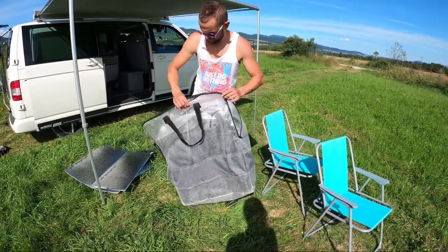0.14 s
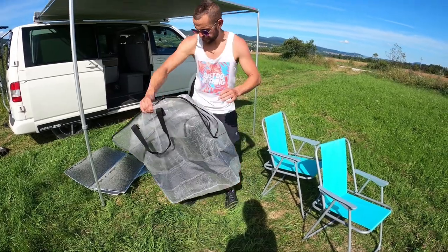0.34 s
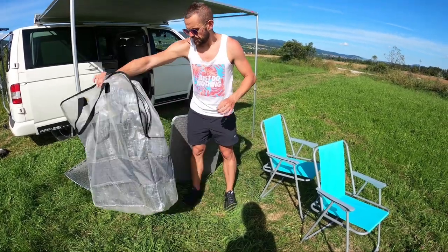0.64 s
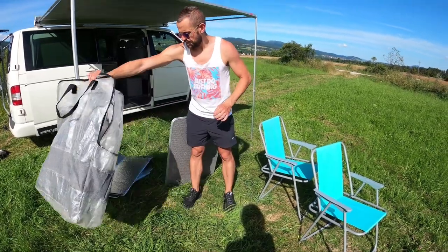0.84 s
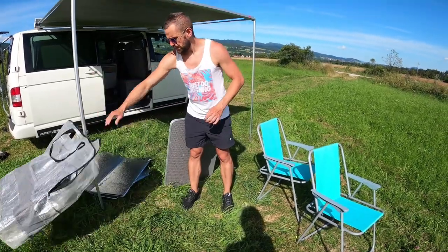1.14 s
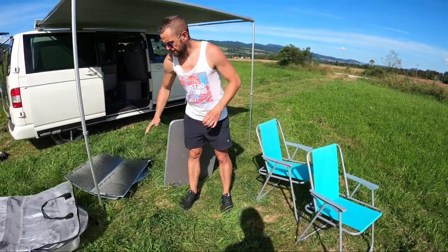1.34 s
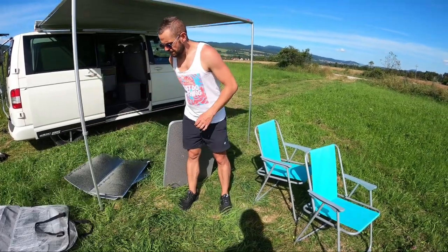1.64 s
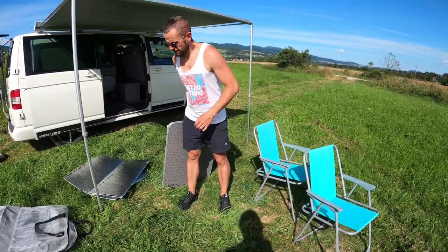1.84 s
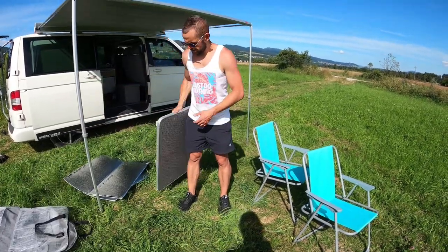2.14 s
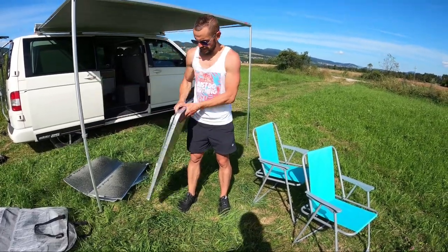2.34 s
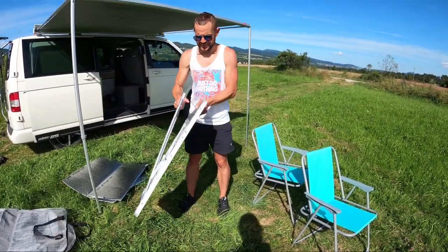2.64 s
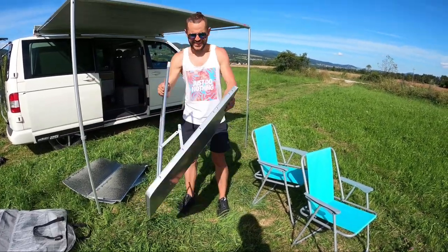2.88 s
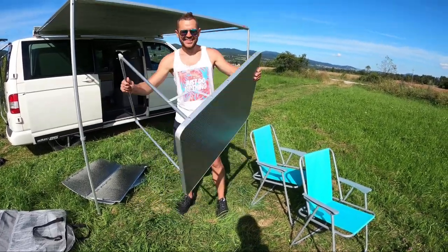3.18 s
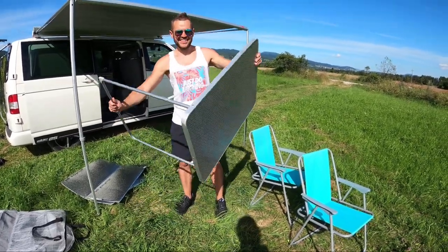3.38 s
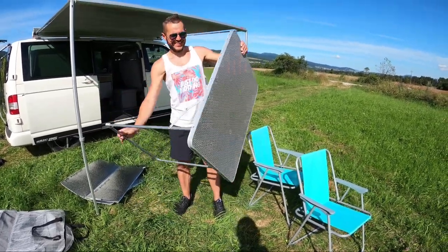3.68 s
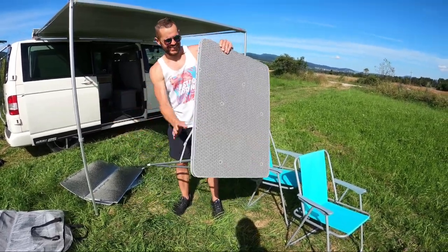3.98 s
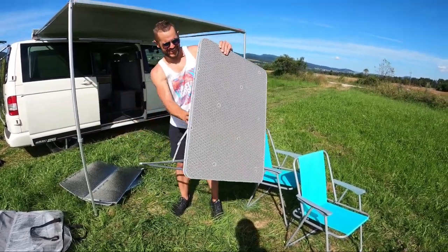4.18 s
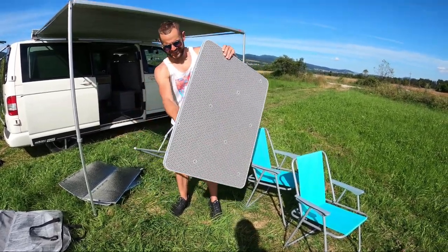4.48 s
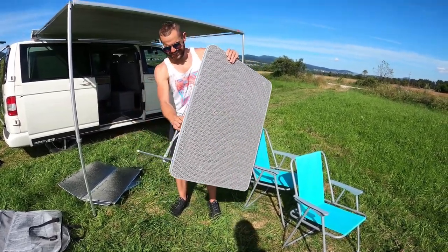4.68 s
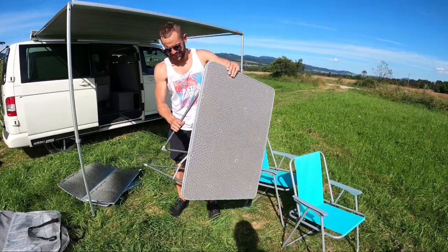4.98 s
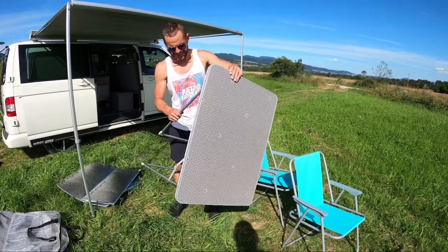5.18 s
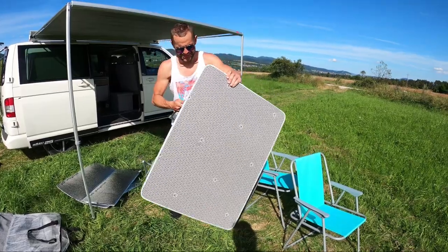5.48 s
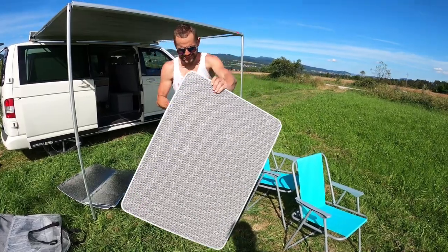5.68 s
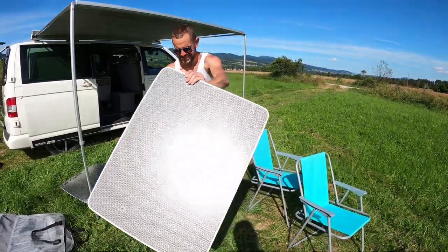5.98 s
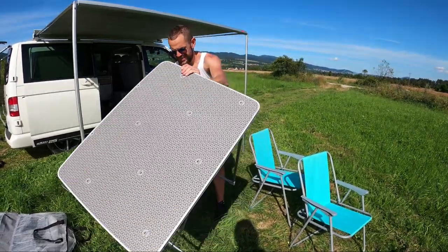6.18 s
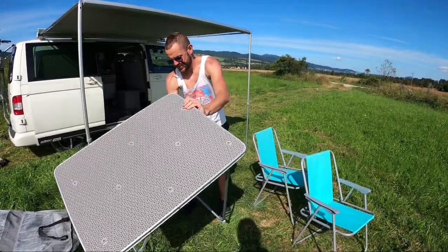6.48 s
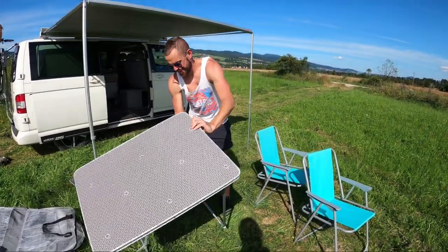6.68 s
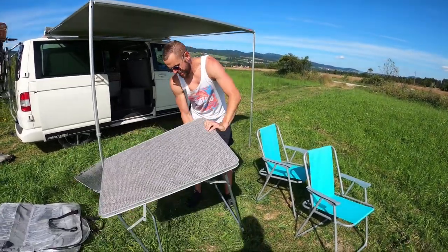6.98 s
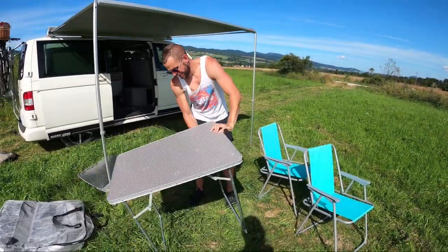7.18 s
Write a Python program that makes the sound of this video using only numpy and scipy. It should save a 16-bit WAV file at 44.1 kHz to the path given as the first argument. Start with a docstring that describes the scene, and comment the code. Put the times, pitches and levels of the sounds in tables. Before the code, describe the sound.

A stiff fabric bag crumples and crunches into grass, then folding table legs clack and groan open before the table is knocked down onto grass.

```python
"""A meadow in the open air, with no echo: soft open air, dry grass, and wind buffeting the microphone ports.
First a stiff fabric bag is pulled off a folding table: noise and tiny ringing cracks crumple, folds pop.
It is tossed to the left and crunches into the grass. Then hands rub the top, and the tubular legs swing out:
hinges and braces clack into the thin top as chattering bursts over ringing modes, stiff hinges drone and grind.
Last, the table is set down on its legs, which changes the balance of the top's modes."""
import sys
import numpy as np
from scipy import signal
from scipy.fft import rfft, irfft, next_fast_len
from scipy.io import wavfile
from scipy.ndimage import map_coordinates

SR = 44100
rng = np.random.default_rng(int(sys.argv[2]) if len(sys.argv) > 2 else 0)


def unload_audio(sound):
    """Save the sound as a 16-bit wav file, at the path given as the first command line argument."""
    columns = np.transpose(np.atleast_2d(sound))
    # keep every value between -1 and 1, then stretch to whole-number steps
    steps = np.round(np.clip(columns, -1, 1) * 32767)
    wavfile.write(sys.argv[1], SR, steps.astype(np.int16))


N = 323253

TOP_HZ = 15800  # band limit at the microphone
BAG_S = 2.3  # the bag lies still by then
SET_DOWN_S = 6.75  # from here on the table stands on its legs
MEADOW_DB, BREEZE_DB = -56.5, -64  # open country; light air between gusts (both before trims)
THUMP_SHARE = 0.21  # thump pitch over knock pitch
TUBE_HZ, TUBE_PER_HARDNESS = 2580, 0.87  # clink pitch of the tubes; clink dB per dB of hardness
CLICK_S, BODY_S = 0.006, 0.0056  # chatter time of these contacts
# how fast swells rise and fall, dB per s
GUST_RISE, GUST_FALL = 210, 122
BAG_RISE, BAG_FALL = 156, 200
SKID_RISE, SKID_FALL = 270, 1100
LAND_RISE, LAND_FALL = 260, 200
RUB_RISE, RUB_FALL = 110, 69
SLIDE_RISE, SLIDE_FALL = 200, 200
DRAG_RISE, DRAG_FALL = 375, 370

# Event levels below are before the trims (.._db) of the functions; spectra are relative.
# likeness of left and right, for more alike and for wider, less alike sounds: [f/Hz, likeness -1 to 1]
MORE_ALIKE = [(250, 0.99), (1000, 0.86), (2500, 0.66), (5000, 0.7), (12000, 0.049)]
LESS_ALIKE = [(150, 0.7), (1000, 0.057), (4000, 0.23), (12000, 0.11)]
BUFFET_ALIKE = [(25, -.1), (60, .5), (130, .8)]
# microphone colour: [f/Hz, left minus right level/dB]
PORT_COLOUR = [(250, -.6), (500, 0), (1100, -1.2), (2500, 1.3), (4500, .4), (9000, -3)]

# spectrum of the open country, and of dry grass stirring: [f/Hz, level/dB]
MEADOW_SPECTRUM = [(35, -40.5), (60, 14.5), (98, -42), (179, -0.5), (343, 0.5), (650, -13), (1250, -3),
                   (1700, -4.5), (2470, -10), (2910, -10), (8870, -22.5), (12300, -42), (13800, -70),
                   (15500, -90)]
STIR_SPECTRUM = [(500, -15), (1300, 0), (4500, -11), (12000, -33)]
# spectrum of the wind on the ports: [f/Hz, level/dB]
BUFFET_SPECTRUM = [(11, -35), (18, 9.5), (85, -5), (184, -22), (241, -27.5), (305, -46), (400, -56),
                   (520, -50), (880, -120)]
# gusts reach the microphone: [start t/s, hold t/s, level/dB]
GUSTS = [(0, 0.059, -54), (1.8, 0.096, -59), (3.79, 0.65, -47), (4.72, 0.16, -44.5), (5.74, 0.068, -35),
         (5.815, 0.05, -25.5), (5.99, 0.057, -25.5), (6.2, 0.12, -45.5), (6.5, .02, -41.5),
         (6.555, 0.077, -34.5), (6.8, 0.18, -40)]
# single low pushes, wind eddies and a low thud of the bag: [centre t/s, envelope peak level/dB, f/Hz]
LOW_PUSHES = [(.165, -45, 55.3), (4.026, -35.5, 47.5), (5.838, -17.5, 71.6), (5.846, -25, 138),
              (6.011, -25, 153), (6.04, -30, 61), (6.564, -23, 30.3), (6.569, -38, 89),
              (6.629, -30.5, 81.6), (6.814, -21, 66)]

# the bag is dragged off, pulled free, held out, tossed, and sinks together:
# [start t/s, hold t/s, crumple level/dB, sliding hiss level/dB, billow level/dB]
BAG_MOVES = [(0, 0.14, -42, -52, -52), (.2, 0.076, -44.5, -56, -52), (.335, 0.044, -41.5, -50, -52),
             (.47, 0.016, -46, -61.5, -52.5), (.56, 0.017, -48.5, -57.5, -52.5),
             (.65, 1.3, -59.5, -68, -68.5), (1.18, 0.082, -53, -58.5, -56.5), (1.6, 0.036, -42, -45, -45.5),
             (1.67, 0.039, -58, -66, -50)]
# the bag's bottom edge skids over the grass: [start t/s, hold t/s, level/dB]
SKID = [(1.2, 0.072, -45.5)]
# a corner, then the whole bag, crushes the grass: [start t/s, hold t/s, level/dB]
LANDING = [(1.505, .03, -46), (1.548, .02, -43), (1.59, 0.043, -36.5)]
# spectra of weave, sliding, skidding over grass and crushed grass: [f/Hz, level/dB]
CRUMPLE_SPECTRUM = [(41, -73), (70, -27), (300, 2.5), (400, -6.5), (520, -7), (690, -5), (1160, -3.5),
                    (1900, -7), (2400, -14.5), (3460, -12), (5530, -25), (9000, -35), (11700, -38),
                    (19800, -120)]
HISS_SPECTRUM = [(1470, -12), (2500, -6), (3100, -9), (5570, -16), (8680, -28), (15500, -36)]
GRASS_SPECTRUM = [(500, -26), (1300, 3), (2500, -1.5), (4700, 1.5), (6500, -5), (8800, -8.5), (11000, -17),
                  (15500, -28)]
CRUNCH_SPECTRUM = [(200, -21), (500, -11.5), (800, -3.5), (1100, 3.5), (1900, -7.5), (3400, -5.5),
                   (5200, -17.5), (9000, -24), (15500, -50)]
# short pops of bag folds, with a few small grass rustles:
# [t/s, crack peak level/dB, crack f/Hz, tick peak level/dB]
POPS = [(.009, -33, 920, -57), (0.073, -24, 2410, -30), (0.096, -34, 870, -68), (0.141, -32, 586, -68),
        (0.166, -31, 796, -67), (0.183, -33, 2550, -56), (.232, -29, 1420, -55), (0.262, -26, 1500, -64),
        (0.293, -29, 1500, -61), (.328, -39, 895, -54), (.357, -32, 900, -53), (.365, -26.5, 1080, -48),
        (0.384, -27.5, 1320, -73), (.426, -33.5, 2300, -61), (0.463, -32.5, 1070, -69),
        (0.487, -39, 1400, -66), (0.546, -39, 1700, -66), (0.575, -34, 1280, -39), (.63, -26.5, 2270, -50),
        (0.682, -36, 4200, -35), (0.797, -38, 3130, -53.5), (1.031, -46, 1400, -68),
        (1.075, -51, 1230, -57), (1.131, -37.5, 1240, -63), (1.188, -31.5, 3580, -50),
        (1.206, -44, 3000, -54), (1.365, -38, 1350, -64), (1.404, -40, 3020, -68),
        (1.659, -33.5, 2400, -50), (1.72, -34.5, 2770, -53), (1.749, -38.5, 1060, -61),
        (1.829, -44, 1280, -63)]
# spectrum of one pop: [f/Hz, level/dB]
POP_SPECTRUM = [(1500, 0.5), (4000, -1.5), (9000, -4), (14000, -28.0)]

# modes of the top on its frame: [nominal f/Hz, held level/dB, standing level/dB, t60 t/s]
TOP_MODES = [(95, 0, -4, .2), (117, -7, 1, .26), (179, -8, 0, .25), (222, -8, -4, .14), (284, 3, -11, .15),
             (345, -2, -4, .1), (393, -6, -3, .11), (441, -3, 3, .13), (570, 2, -14, .14),
             (679, -10, 1, .13), (732, 2, -2, .12), (810, 3, 2, .13), (895, 3, 3, .13), (1075, -2, -6, .12),
             (1178, -5, -3, .13), (1255, -9, -2, .11), (1325, -4, -2, .11), (1520, -1, -6, .12),
             (1590, -1, -4, .12), (1750, -5, -6, .11), (1888, -5, -2, .13), (2158, -2, -2, .13),
             (2690, -7, -8, .1), (3069, -9, -8, .1), (3330, -6, -11, .1), (3461, -12, -9, .1),
             (4062, -16, -13, .1)]
# decay of the dense modes of the frame: [f/Hz, t60 t/s]
FRAME_DECAY = [(150, 0.46), (800, 0.17), (3000, 0.12), (10000, 0.16)]
# spectrum of one contact: [f/Hz, level/dB]
CLACK_SPECTRUM = [(60, -5.5), (150, 5), (300, 3.5), (440, 5.5), (540, 2.5), (830, 3), (1700, 0),
                  (2150, 0.5), (2450, -4), (3300, -8), (5000, -7.5), (7000, -27.5), (9500, -34),
                  (12000, -44), (15500, -55)]
# low and middle body of blows on the top, with some soft thuds: [t/s, level/dB, pitch f/Hz]
BODIES = [(1.88, -42.5, 153), (1.92, -43.5, 189), (1.95, -45.5, 221), (1.975, -42.5, 202),
          (2.187, -59, 200), (2.268, -58.5, 425), (2.345, -59.5, 483), (2.542, -54.5, 219),
          (3.112, -44, 496), (3.147, -39.5, 342), (4.167, -27, 300), (4.173, -30, 90), (4.216, -27.5, 85),
          (4.228, -27, 515), (4.275, -35, 630), (4.305, -35, 110), (4.346, -43, 130), (4.815, -32.5, 167.6),
          (4.82, -33, 650), (4.86, -25.5, 403), (4.867, -26, 800), (4.902, -32, 795), (5.116, -51, 185),
          (6.668, -44, 187.2), (6.797, -34.5, 86), (6.817, -24.5, 78), (6.847, -25, 600), (6.848, -26, 240),
          (6.85, -26, 98.4), (6.876, -35, 560), (6.93, -32, 610), (6.971, -29.5, 188), (6.987, -28.5, 620),
          (7.02, -35.5, 181)]
# hands, clothes and tubes rubbing, and a step on grass; long rows are the steady grip:
# [start t/s, hold t/s, scrape level/dB, hiss level/dB]
RUBS = [(1.9, 3.8, -61.5, -70.5), (2.25, 0.035, -65, -56), (2.55, 0.11, -77, -63.5), (2.8, 0.4, -60, -60.5),
        (3.46, 0.076, -51, -59.5), (4.48, 0.5, -51, -95), (5.17, 0.12, -53, -63), (5.59, 0.032, -63, -84),
        (5.6, 3.3, -64, -93), (6.66, 0.043, -52, -73), (7.08, 0.31, -91, -65.5)]
# the top brushes past clothing: [start t/s, hold t/s, level/dB]
SLIDE = [(2.9, 0.066, -48.5)]
# spectra of scraping, brushing and passing clothing: [f/Hz, level/dB]
SCRAPE_SPECTRUM = [(88, -12.5), (150, 14), (251, 6), (292, 3.5), (457, -0.5), (1300, 2), (2340, -10),
                   (8000, -34.5), (10400, -89), (17600, -120)]
BRUSH_SPECTRUM = [(2000, 0), (5000, -5.0), (9000, -9.0), (12500, -16), (15500, -34)]
SWISH_SPECTRUM = [(880, -6), (1500, -3.5), (2370, -3.5), (4390, -3), (6750, -14.5), (9420, -13),
                  (14200, -30), (15500, -36)]
# legs and braces knock on the top: [t/s, level/dB, pitch f/Hz, contact hardness/dB, chatter t/s]
KNOCKS = [(1.92, -38, 1170, 0.5, 0.03), (1.974, -47, 1680, -5, 0.003), (2.572, -48, 1680, -3, 0.0096),
          (2.715, -44, 1160, 9, 0.017), (2.992, -36.5, 1280, -8, 0.0041), (3.11, -28, 2050, 18.5, 0.008),
          (3.132, -30, 1720, -16, 0.024), (3.147, -32, 1000, 10, 0.0025), (3.42, -34.5, 1800, 1, 0.0065),
          (3.54, -39, 840, 15, 0.0046), (3.655, -33, 815, 2, 0.0023), (3.725, -25.5, 2000, 7, 0.0014),
          (3.74, -33, 760, 9.5, 0.03), (4.166, -29, 890, 10, 0.011), (4.184, -25.5, 655, 7.5, 0.034),
          (4.223, -16, 1220, -1, 0.0024), (4.227, -12, 960, 6, 0.0016), (4.269, -24.5, 890, 4.5, 0.0075),
          (4.274, -18.5, 880, 1, 0.01), (4.302, -29, 690, 9.5, 0.0051), (4.33, -29, 765, -1, 0.0086),
          (4.364, -29, 890, 2, 0.0044), (4.375, -23.5, 970, -3, 0.0012), (4.502, -31.5, 890, -4, 0.003),
          (4.544, -34.5, 950, -5, 0.0068), (4.74, -43, 1200, 1, .008), (4.76, -18.5, 1084, 4.5, 0.0085),
          (4.817, -21, 633, -12, 0.0085), (4.856, -16, 840, -4, 0.0053), (4.864, -16.5, 770, -8, 0.0041),
          (4.877, -16.5, 766, -4.5, 0.0095), (4.9, -19.5, 740, -6, 0.0079), (4.927, -21, 838, -11, 0.0048),
          (4.988, -32, 635, 2.5, 0.014), (5.116, -36.5, 770, 14, 0.004), (5.222, -41.5, 1580, 21.5, 0.0071),
          (5.263, -36, 713, -6, 0.019), (5.304, -35.5, 835, -5, 0.007), (5.355, -31.5, 866, -7, 0.0026),
          (6.667, -47.5, 1000, 10, 0.006), (6.703, -46, 1105, 4, 0.0076), (6.804, -30.5, 800, 9, 0.017),
          (6.824, -20.5, 994, 10.5, 0.006), (6.848, -8.5, 830, 7, 0.0035), (6.871, -35, 1000, 23.5, 0.037),
          (6.913, -27.5, 790, 9, 0.019), (6.925, -25, 1120, 8, 0.0077), (6.931, -12.5, 975, 8.5, 0.012),
          (6.973, -29, 1670, 18, 0.005), (6.989, -16.5, 893, 6.5, 0.0064), (7.05, -27.5, 725, 11.5, 0.0048),
          (7.104, -40, 1100, -15, 0.0086)]
# light clicks of metal, the bright edge of some hard knocks, and a small grass rustle:
# [t/s, level/dB, pitch f/Hz, contact hardness/dB]
CLICKS = [(2.013, -60, 3800, -18), (2.165, -50, 4334, -2), (2.182, -55, 3100, -7),
          (3.059, -42.5, 2350, -13), (3.082, -48.5, 2640, -11), (3.947, -47.5, 3920, -4),
          (4.377, -37.5, 2460, -30), (6.391, -43.5, 3100, -1.5), (6.502, -49.5, 2690, -4.5),
          (6.639, -61, 2500, 1.5), (6.794, -45, 3125, -1.5), (6.849, -39.5, 3000, 8.5)]
# hinges drag under load: [start t/s, hold t/s, drone level/dB, grind level/dB, drone f/Hz]
DRAGS = [(4.197, 0.15, -35.5, -38.5, 285), (4.41, 0.0495, -33, -60, 110.8), (4.507, 0.17, -38, -68, 299.2),
         (4.747, 0.025, -38, -40, 307.5), (4.808, 0.02, -29, -29.5, 281), (4.864, 0.052, -19, -22, 275.5),
         (4.954, 0.026, -31, -40, 282), (5.127, 0.044, -37, -64, 157), (5.254, 0.066, -45.5, -51, 292.6),
         (6.851, 0.13, -24.5, -28, 116.2)]


def amp(db):
    """Decibels to gain."""
    return 10 ** (np.asarray(db) / 20)


def unit(x):
    """Scale to rms 1."""
    return x / np.sqrt(np.mean(x ** 2) + 1e-20)


def along(points, hz):
    """Read (Hz, value) points on a log axis."""
    f, v = np.transpose(points)
    return np.interp(np.log(hz + 1), np.log(f + 1), v)


def wobble(rate):
    """A smooth random curve, rate knots a second."""
    knots = rng.standard_normal(int(N * rate / SR) + 4)
    return map_coordinates(knots, [np.arange(N) * rate / SR])


def white():
    """Unrelated white noise for two ports."""
    return rng.standard_normal((2, N))


def filtered(x, response):
    """x times a response of frequency."""
    n = x.shape[-1]
    m = next_fast_len(n + SR // 10)
    return irfft(rfft(x, m) * response(np.fft.rfftfreq(m, 1 / SR)), m)[..., :n]


def causal(gain):
    """The minimum-phase response with this gain, by folding the cepstrum."""
    cepstrum = irfft(np.log(np.maximum(gain, 1e-6)))
    half = len(cepstrum) // 2
    cepstrum[1:half] *= 2
    cepstrum[half + 1:] = 0
    return np.exp(rfft(cepstrum))


def band(x, lo_hz, hi_hz):
    """A causal band-pass."""
    edges = [lo_hz, min(hi_hz, SR / 2 - 1)]
    return signal.sosfilt(signal.butter(2, edges, "band", fs=SR, output="sos"), x)


def stereo(pair, spectrum, alike):
    """Two unrelated signals become a coloured, partly alike left and right of rms 1."""
    def mid_side(hz):
        turn = np.arccos(np.clip(along(alike, hz), -1, 1)) / 2
        return causal(amp(along(spectrum, hz))) * [np.cos(turn), np.sin(turn)]

    mid, side = filtered(pair, mid_side)
    return unit(np.array([mid + side, mid - side]))


def add(out, s, x):
    """Mix x into out from time s."""
    part = out[:, max(round(s * SR), 0):][:, :x.shape[-1]]
    part += x[..., :part.shape[-1]]


def swells(rows, rise, fall):
    """Rows (start, hold, dB, ..) rise, hold and fall at so many dB per s; one gain curve per dB column."""
    t = np.arange(N) / SR
    start, hold, *cols = np.transpose(rows)[:, :, None]
    before, after = np.maximum(start - t, 0), np.maximum(t - start - hold, 0)
    shape = amp(-abs(rise) * before - abs(fall) * after)
    return [np.linalg.norm(amp(db) * shape, axis=0) for db in cols]


def crinkles(length_s, rate, spread_db, cycles):
    """Small folds or blades buckle at random, each ringing a few cycles at its own pitch; white on average."""
    n, t = int(length_s * SR), np.arange(SR // 140) / SR
    when, pitch, size, phase, turn = rng.random((int(rate * length_s), 5)).T[:, :, None]
    hz = 350 * (TOP_HZ / 350) ** pitch
    strength = hz * amp(-spread_db * np.log(.05 + .95 * size))
    ring = strength * np.exp(-t * hz / abs(cycles)) * np.sin(2 * np.pi * hz * t)
    at = ((when * n).astype(int) + np.arange(len(t))).ravel()
    signs = np.sign(phase - .5), np.sign(turn - .5)  # random polarity at each port
    pair = np.array([np.bincount(at, (ring * sign).ravel(), N)[:N] for sign in signs])
    return pair / np.sqrt(np.mean(pair[:, :n] ** 2))


def meadow(air_db=-2.0, stir_db=-14, sway_db=4.5):
    """The soft rush of open country, as slowly swaying noise; dry grass ticks lightly where clothes and feet
    stir it."""
    air = amp(air_db + wobble(1.425)) * stereo(white(), MEADOW_SPECTRUM, LESS_ALIKE)
    ticks = crinkles(N / SR, rate=110, spread_db=5, cycles=5)
    stir = amp(stir_db + sway_db * wobble(7)) * stereo(ticks, STIR_SPECTRUM, LESS_ALIKE)
    return amp(MEADOW_DB) * (air + stir)


def wind(buffet_db=-1, push_db=0, flutter_db=3):
    """Wind buffets the two ports as fluttering low noise; single low pushes are eddies and a thud of the bag."""
    eddies = amp(flutter_db * wobble(37)) * white()
    strength = swells(GUSTS, GUST_RISE, GUST_FALL)[0] + amp(BREEZE_DB)
    out = amp(buffet_db) * strength * stereo(eddies, BUFFET_SPECTRUM, BUFFET_ALIKE)
    t = np.arange(-SR // 10, SR // 10) / SR
    for s, db, hz in LOW_PUSHES:  # the air swings to and fro once or twice
        phase = rng.uniform(0, 2 * np.pi) + rng.normal(0, 1.0, (2, 1))
        push = np.exp(-(hz * t) ** 2) * np.cos(2 * np.pi * hz * t + phase)
        add(out, s + t[0], amp(db + push_db) * push)
    return out


def bag(crumple_db=1.0, hiss_db=4.5, left_db=3, billow_db=0, skid_db=0, crunch_db=0):
    """The stiff weave crumples in pitched cracks, billows softly, hisses as it slides, crunches into grass."""
    def blades():
        return crinkles(BAG_S, rate=2200, spread_db=4, cycles=2.5) + .3 * white()

    crumple, hiss, flap = swells(BAG_MOVES, BAG_RISE, BAG_FALL)
    folds = crinkles(BAG_S, rate=1400, spread_db=4, cycles=2.8) + .25 * white()
    folds = amp(2 * wobble(35)) * folds
    cracks = crumple * amp(crumple_db) * stereo(folds, CRUMPLE_SPECTRUM, MORE_ALIKE)
    billow = flap * amp(billow_db) * unit(band(white()[0], 117, 370))
    slide = hiss * amp(hiss_db) * stereo(blades(), HISS_SPECTRUM, LESS_ALIKE)

    stalks = blades()
    skidding = swells(SKID, SKID_RISE, SKID_FALL)[0]
    skid = skidding * amp(skid_db) * stereo(stalks, GRASS_SPECTRUM, LESS_ALIKE)
    landing = swells(LANDING, LAND_RISE, LAND_FALL)[0]
    crunch = landing * amp(crunch_db) * stereo(stalks, CRUNCH_SPECTRUM, MORE_ALIKE)

    thrown = np.clip((np.arange(N) / SR - .9) / 0.18, 0, 1)  # it flies off to the left
    pan = amp(np.outer([.5, -.5], left_db * thrown))
    busy = np.sqrt(BAG_S * SR / N)  # levels count only while the bag moves
    return (busy * (cracks + slide + skid + crunch) + billow) * pan


def peaked(x):
    """Scale to peak 1."""
    return x / np.abs(x).max()


def pops(crack_db=3, tick_db=9, flap_db=-8):
    """Bag folds, and a few grass rustles, as noise bursts: a hollow crack, a lower flap and a bright tick."""
    out, t = np.zeros((2, N)), np.arange(SR // 20) / SR
    fade = np.exp(-t / .0015) + .1 * np.exp(-t / .008)
    for s, crack, hz, tick in POPS:
        pop = stereo(fade * rng.standard_normal((2, len(t))), POP_SPECTRUM, MORE_ALIKE)
        flap = amp(flap_db) * peaked(band(pop, 0.19 * hz, 0.64 * hz))
        body = peaked(band(pop, 0.51 * hz, 1.42 * hz)) + flap
        add(out, s, amp(crack + crack_db) * body)
        add(out, s, amp(tick + tick_db) * peaked(band(pop, 4600, TOP_HZ)))
    return out


def top_modes(standing):
    """Pitch, level and decay of the top's modes, in the hands or on its legs."""
    hz, held_db, standing_db, t60 = np.transpose(TOP_MODES)
    return hz, standing_db if standing else held_db, t60


def top_ring(t, standing):
    """The decaying modes of the top, struck at a new spot."""
    hz, db, t60 = np.array(top_modes(standing))[:, :, None]
    strength = amp(db + rng.normal(0, 3, hz.shape)) * rng.choice([-1, 1], hz.shape)
    bent_hz = hz * (1 + rng.normal(0, .012, hz.shape))  # each blow detunes every mode a little at random
    return np.sum(strength * amp(-60 * t / t60) * np.sin(2 * np.pi * bent_hz * t), axis=0)


def frame_modes(t, count):
    """Many close modes of tubes and braces, each with its band's decay; a sine and a cosine for each."""
    hz = ((np.arange(count) + rng.random(count)) * TOP_HZ / count)[:, None]
    radiated = amp(rng.uniform(-2, 2, hz.shape))
    fade = radiated * amp(-60 * t / along(FRAME_DECAY, hz))
    phase = 2 * np.pi * hz * t
    return np.vstack([fade * np.sin(phase), fade * np.cos(phase)])


def strike(s, chatter, modes, t, frame_db, ring_db=-3.5, uneven_db=5):
    """Loose joints chatter for milliseconds, frame and top ring on; gives joints with frame, then all."""
    u = t / max(chatter, .002)
    onset = 1 - np.exp(-6 * u)
    bounces = amp(uneven_db * map_coordinates(rng.standard_normal(400), [t * 1000]))
    contact = bounces * rng.standard_normal((2, len(t))) * np.exp(-u ** 2)
    frame = rng.standard_normal((2, len(modes))) @ modes
    blow = (unit(contact) + amp(frame_db) * unit(frame)) * onset
    joints = stereo(blow, CLACK_SPECTRUM, MORE_ALIKE)
    return joints, joints + amp(ring_db) * unit(top_ring(t, s > SET_DOWN_S) * onset)


def struck(x, lo_hz, hi_hz):
    """One band of a blow, with rms 1 over its first 20 ms."""
    x = band(x, lo_hz, hi_hz)
    return x / np.sqrt(np.mean(x[:, :SR // 50] ** 2))


def table():
    """One top and one frame answer every kind of blow."""
    t = np.arange(SR // 5) / SR
    modes = frame_modes(t, count=520)
    return bodies(modes, t) + knocks(modes, t) + clicks(modes, t)


def bodies(modes, t, body_db=-1):
    """The low and middle body of blows on the top, and some soft thuds: one band of a strike each."""
    out = np.zeros((2, N))
    for s, db, hz in BODIES:
        _, whole = strike(s, BODY_S, modes, t, frame_db=-9, ring_db=-1.5)
        add(out, s, amp(db + body_db) * struck(whole, 0.56 * hz, 0.69 * hz + 110))
    return out


def grains(rate, spread_db, smooth):
    """Tiny slips of a millisecond at random moments, some larger, over smooth friction noise."""
    sizes = amp(spread_db * np.minimum(rng.exponential(size=N), 3))
    slips = (rng.random(N) < rate / SR) * sizes
    strength = signal.lfilter([1], [1, -np.exp(-1000 / SR)], slips ** 2)
    return unit(np.sqrt(strength / strength.mean() + smooth ** 2) * white())


def handling(scrape_db=-3, hiss_db=-2, swish_db=1):
    """Hands, clothes and tubes rub, and a step falls on grass: grainy friction noise in swells."""
    def friction():
        return grains(rate=600, spread_db=3, smooth=.9)

    scrape, hiss = swells(RUBS, RUB_RISE, RUB_FALL)
    rub = scrape * amp(scrape_db) * stereo(friction(), SCRAPE_SPECTRUM, MORE_ALIKE)
    brush = hiss * amp(hiss_db) * stereo(friction(), BRUSH_SPECTRUM, LESS_ALIKE)
    passing = swells(SLIDE, SLIDE_RISE, SLIDE_FALL)[0]
    swish = passing * amp(swish_db) * stereo(friction(), SWISH_SPECTRUM, LESS_ALIKE)
    return rub + brush + swish


def knocks(modes, t, clack_db=-10, thump_db=-14, clink_db=-20, snap_db=-27):
    """A clack with a thump some two octaves below; the harder the contact, the more tubes clink and snap."""
    out = np.zeros((2, N))
    for s, db, hz, hardness, chatter in KNOCKS:
        joints, whole = strike(s, chatter, modes, t, frame_db=-5.5)
        thump_hz = THUMP_SHARE * hz
        thump = amp(thump_db) * struck(whole, 0.78 * thump_hz, thump_hz + 230)
        clack = amp(clack_db) * struck(whole, 0.68 * hz, 1.77 * hz)
        clink_gain = amp(clink_db + TUBE_PER_HARDNESS * hardness)
        clink = clink_gain * struck(whole, 1.06 * TUBE_HZ, 2.18 * TUBE_HZ)
        snap = amp(snap_db + hardness) * struck(joints, 7540, TOP_HZ)
        add(out, s, amp(db) * (thump + clack + clink + snap))
    return out


def clicks(modes, t, clack_db=-9, clink_db=-2, snap_db=-3):
    """Light clicks, the bright edge of some hard knocks and a grass rustle: upper bands of a strike."""
    out = np.zeros((2, N))
    for s, db, hz, hardness in CLICKS:
        joints, whole = strike(s, CLICK_S, modes, t, frame_db=-2.5, ring_db=-5.5)
        clack = amp(clack_db) * struck(whole, 0.36 * hz, hz)
        clink = amp(clink_db) * struck(whole, 0.78 * hz, 1.43 * hz)
        snap = amp(snap_db + hardness) * struck(joints, 7900, TOP_HZ)
        add(out, s, amp(db) * (clack + clink + snap))
    return out


def resonances(f, standing):
    """The causal response of the top's modes."""
    hz, db, t60 = top_modes(standing)
    width = np.log(1000) / np.pi / t60
    return sum(g * 1j * f * w / (c * c - f * f + 1j * f * w) for c, g, w in zip(hz, amp(db), width))


def hinges(drone_db=-8, grind_db=-6, scratch_db=-3, steady=1.0):
    """Stiff hinges stick and slip: they grind through the top's modes and keep one low mode droning."""
    strain, rattle = swells([row[:4] for row in DRAGS], DRAG_RISE, DRAG_FALL)
    t = np.arange(N) / SR
    slips = grains(rate=600, spread_db=3, smooth=.2)
    held = unit(filtered(slips[0], lambda f: resonances(f, False)))
    standing = unit(filtered(slips[0], lambda f: resonances(f, True)))
    scratch = amp(scratch_db) * stereo(slips, CLACK_SPECTRUM, MORE_ALIKE)
    grind = np.where(t > SET_DOWN_S, standing, held) + scratch

    # the pitch holds for half of each drag's hold time, then glides to the next
    pitch_points = [(s + end, hz) for s, hold, _, _, hz in DRAGS for end in (0, hold / 2)]
    hz = np.interp(t, *np.transpose(pitch_points))
    phase = 2 * np.pi * np.cumsum(hz) / SR
    tone = (steady + wobble(55)) * np.sin(phase) + wobble(55) * np.cos(phase)  # unsteady level and phase
    drone = amp(drone_db) * strain * unit(tone)
    return drone + amp(grind_db) * rattle * unit(band(grind, 180, 3000))


def scene():
    """Wind, bag, table and hands in the open air."""
    return meadow() + wind() + bag() + pops() + table() + handling() + hinges()


def record(dry, lag=.00002):
    """The left port hears lag seconds later and differs in colour; nothing passes the band limit."""
    half = np.array([[.5], [-.5]])  # each port takes half of the difference

    def ports(hz):
        colour = amp(half * along(PORT_COLOUR, hz))
        delay = np.exp(-2j * np.pi * hz * half * lag)
        return colour * delay * (hz < TOP_HZ)

    return filtered(dry, ports)


dry = scene()
out = record(dry)
unload_audio(out)
```